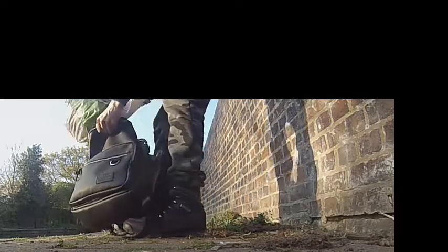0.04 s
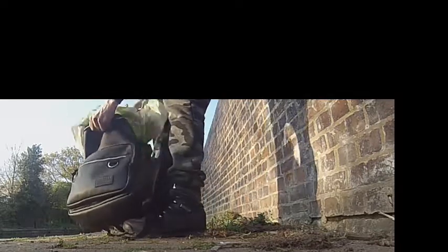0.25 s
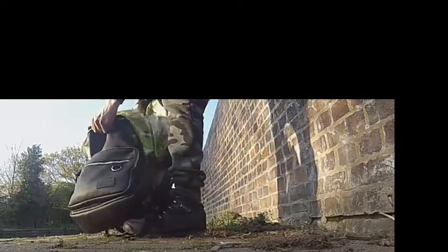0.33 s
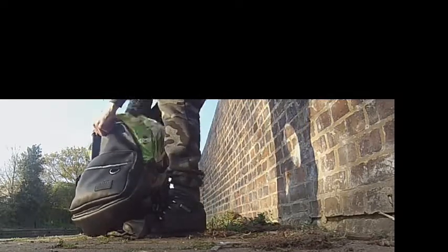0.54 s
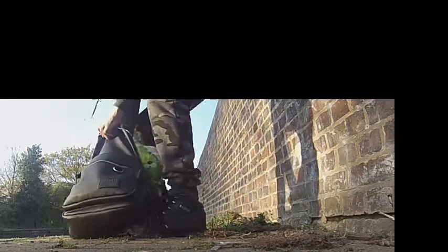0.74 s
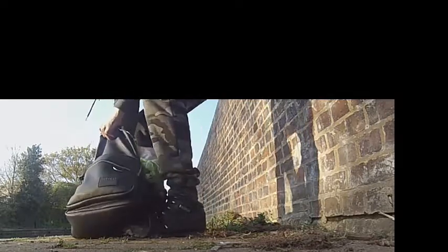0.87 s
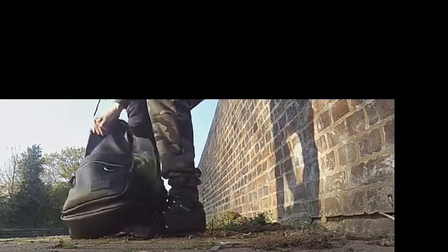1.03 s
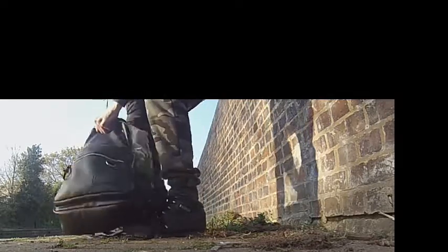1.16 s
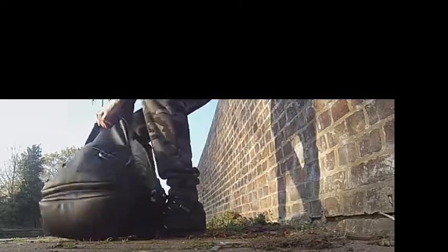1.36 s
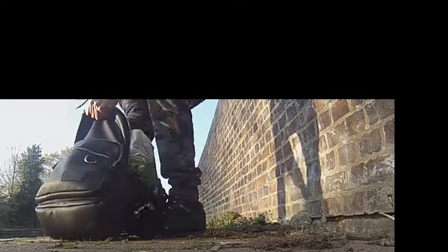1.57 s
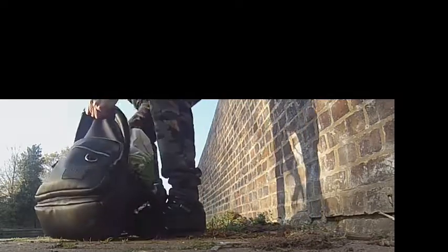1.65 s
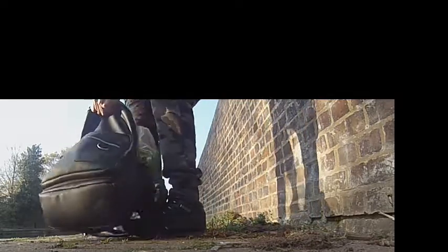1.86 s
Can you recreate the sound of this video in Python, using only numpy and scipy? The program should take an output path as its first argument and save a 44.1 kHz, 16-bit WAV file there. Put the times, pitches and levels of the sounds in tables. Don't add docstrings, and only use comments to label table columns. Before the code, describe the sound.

A plastic sack is stuffed into a fabric backpack, heard very close outdoors. Faint crinkles and tiny zip-pull ticks open; from 0.25 s crackling swells with sharp snaps. Dense rustling, stiff cracks and jerky seam creaks peak around 0.6-0.9 s. Rasping continues, with cloth thuds near 1.3 s, zip teeth and a buckle knock at 1.43-1.53 s, then sparse crinkles to about 1.9 s. Short wall echo, faint traffic.

```python
import sys
import numpy as np
from scipy import signal
from scipy.io import wavfile
from scipy.ndimage import uniform_filter1d

SR = 44100
rng = np.random.default_rng(int(sys.argv[2]) if len(sys.argv) > 2 else 0)


def generate_wav(sig):
    pcm = np.round(np.clip(np.atleast_2d(sig).T, -1, 1) * 32767).astype(np.int16)
    wavfile.write(sys.argv[1], SR, pcm)


def boost_factor(decibels):
    exponent = np.asarray(decibels, float) / 20
    return 10 ** exponent


N = 83790

# (start [s], peak [s], end [s], level [dB], treble lift [dB])
SQUEEZES = [(-.05, 0.042, 0.18, -45.5, -8), (0.137, 0.175, 0.2, -41.5, 3), (0.204, 0.21, 0.27, -38.5, -2),
            (0.25, 0.303, 0.42, -20, 5), (0.337, 0.386, 0.61, -30, -1), (0.394, 0.504, 0.63, -32.5, 7.5),
            (0.537, 0.623, 0.72, -22, 4), (0.683, 0.747, 0.75, -22.5, -1), (0.73, 0.77, 0.85, -27, 2),
            (0.812, 0.85, 0.99, -25, 2.5), (0.9, 0.945, 0.995, -36.5, -2), (0.96, 1.129, 1.153, -25, 3.5),
            (1.172, 1.208, 1.303, -27, 6), (1.196, 1.267, 1.6, -31, -3), (1.273, 1.363, 1.394, -25.5, 2),
            (1.36, 1.423, 1.43, -33.5, 5.5), (1.47, 1.562, 1.62, -34, 0), (1.553, 1.624, 1.67, -36, 3),
            (1.63, 1.703, 1.77, -49, 0), (1.753, 1.813, 1.78, -43.5, 1)]
# (frequency [Hz], level [dB])
FILM_SPECTRUM = [(250, -22), (500, -6), (1100, -5.5), (2500, -8.5), (4700, -10.5), (7500, -13),
                 (9200, -19.5), (15800, -26)]
# (time [s], peak [dB], centre [Hz], ring [s])
CREASE_SNAPS = [(.004, -40, 6900, 0.0017), (.032, -34, 5500, .005), (.0505, -30, 6000, 0.0065),
                (.104, -38, 8050, .003), (.131, -31, 11000, .003), (.170, -39, 7000, .004),
                (.215, -32, 8000, .003), (.223, -30, 10000, .003), (.236, -20, 7900, 0.0047),
                (.295, -11.5, 4840, 0.021), (.372, -15, 10000, 0.0054), (.404, -10, 10500, 0.004),
                (.419, -16, 9000, .003), (.444, -24, 8000, 0.0046), (.455, -22.5, 7000, 0.0033),
                (.472, -31, 9000, .004), (.490, -23, 10000, .003), (.499, -16, 10000, .004),
                (.606, -10, 12100, 0.0058), (.856, -9, 3500, 0.006), (.862, -9, 2930, 0.0035),
                (.937, -28, 8000, .004), (1.008, -34, 12000, 0.0027), (1.048, -15, 8900, 0.0036),
                (1.075, -26, 11000, .003), (1.102, -23, 5000, 0.0034), (1.119, -22, 8100, 0.0023),
                (1.187, -27, 6000, .003), (1.194, -31, 9000, 0.0033), (1.249, -19, 8500, 0.0046),
                (1.265, -22, 10000, .004), (1.309, -14, 7800, 0.0057), (1.375, -19, 5000, .003),
                (1.383, -14, 12500, 0.015), (1.399, -20, 11000, 0.0078), (1.539, -32, 9000, .004),
                (1.552, -26, 8000, 0.0046), (1.563, -15.5, 3870, 0.0079), (1.571, -28, 9000, .004),
                (1.614, -34, 6000, .003), (1.703, -30, 4000, .005), (1.740, -29, 8000, 0.003),
                (1.789, -25, 5960, 0.004), (1.803, -25.5, 4200, 0.0099), (1.822, -29, 4900, 0.0097),
                (1.827, -29, 6440, 0.007), (1.886, -34.5, 5000, .006)]
# (time [s], peak [dB], centre [Hz], ring [s])
FOLD_CRACKS = [(.7005, -9, 5000, .006), (.7065, -15, 5000, .004), (.7235, -14, 4300, .004),
               (.7355, -12, 4200, .005), (.743, -14, 6000, .006), (.7485, -10, 5400, .005),
               (.8488, -13, 6300, .003), (.8533, -2, 6400, .004)]
# (time [s], level [dB])
HAND_PUSH = [(0, -45.5), (0.199, -45), (0.211, -34), (.262, -32.5), (.278, -26), (.48, -34.5),
             (.645, -22.5), (.785, -25.5), (0.801, -25.5), (0.91, -20.5), (0.953, -34), (1.11, -27.5),
             (1.163, -30.5), (1.367, -22), (1.392, -35.5), (1.571, -32), (1.67, -46.5), (1.9, -46.5)]
# (frequency [Hz], level [dB])
CLOTH_SPECTRUM = [(40, -13), (120, -5), (250, -2), (420, 2), (750, -2.5), (1200, -6.5), (2500, -9),
                  (15000, -28.5)]
# (time [s], peak [dB], centre [Hz],
# ring [s])
CLOTH_THUDS = [(.205, -21.5, 600, 0.035), (.271, -21, 424, 0.013), (1.308, -17.5, 930, 0.015),
               (1.3528, -12, 1485, 0.0015), (1.358, -16, 1490, .0015), (1.3647, -14, 1500, 0.0017),
               (1.3724, -12, 2000, 0.0025), (1.3828, -15, 1800, 0.004), (1.561, -19.5, 895, 0.036),
               (1.775, -26, 530, 0.0026), (1.777, -30.5, 450, 0.01), (1.7815, -30, 603, .002),
               (.232, -24.5, 494, .015)]
# (start [s], length [s], level [dB], first slip rate [1/s], last slip rate [1/s])
SEAM_CREAKS = [
    (.628, .075, -27, 400, 110),
    (.824, 0.084, -25, 230, 180),
    (1.285, .065, -30, 300, 250),
    (.266, .07, -30.5, 380, 200),
]
# (time [s], peak [dB])
SEAM_JERKS = [(0.276, -21), (0.291, -18), (0.2959, -22), (0.3299, -18), (0.3489, -21), (0.5458, -25.5),
              (0.5617, -21), (0.587, -23), (0.5938, -22), (0.6234, -15), (0.6382, -18), (0.6464, -11.5),
              (0.6521, -12), (0.6577, -10.5), (0.663, -13), (0.6674, -11.5), (0.6799, -13), (0.6885, -17),
              (0.7008, -19), (0.7152, -17), (0.7398, -13), (0.7472, -18), (0.7858, -17), (0.801, -8),
              (0.8074, -12), (0.8127, -11), (0.8166, -14), (0.8216, -13), (0.8471, -10), (0.8636, -12),
              (0.8689, -16), (0.8844, -9), (0.907, -16), (1.0601, -18), (1.1231, -27), (1.3101, -14),
              (1.3528, -13), (1.358, -21), (1.3647, -15), (1.372, -20)]
# (frequency [Hz], level [dB])
SEAM_SPECTRUM = [(40, -22), (100, -11), (400, -1), (800, -1), (1500, -21), (4000, -21), (15000, -35.5)]
# (time [s], peak [dB], centre [Hz], ring [s])
ZIP_TEETH = [(1.441, -22, 5900, 0.0065), (1.448, -22, 5300, 0.0088), (1.456, -19, 6200, 0.013),
             (1.460, -16.5, 4700, 0.013), (1.464, -24, 6500, .008), (1.469, -18, 5940, 0.014),
             (1.481, -19, 6160, 0.013), (1.488, -29, 6000, 0.0088), (1.500, -24, 6060, 0.0093),
             (1.509, -24, 5900, .005), (1.521, -32, 6460, .005), (1.532, -26, 5960, 0.0076)]
# (time [s], peak [dB])
PULL_TICKS = [(0.07, -38), (.076, -36), (0.081, -25.5), (0.089, -36), (.109, -35), (.120, -33),
              (.126, -28.5), (.138, -43), (.157, -35), (.180, -41), (0.231, -24), (0.236, -28), (.242, -32),
              (0.248, -26)]
# (frequency [Hz], level [dB], T60 [s])
PULL_MODES = [(4170, 3.5, 0.011), (3900, -26, 0.0072), (5900, -6.5, 0.017), (7900, -10, 0.0079),
              (10200, -22, .006)]
# (time [s], peak [dB], frequency [Hz], T60 [s])
BUCKLE_KNOCKS = [
    (1.170, -22, 3130, 0.024),
    (1.431, -21, 2240, 0.022),
    (1.450, -37, 12600, .02),
    (1.483, -12, 2180, 0.017),
]
# (frequency [Hz], level [dB])
HUM_SPECTRUM = [(18, -9), (80, 2), (375, -6), (950, -4), (1800, -15), (2700, -27), (7000, -35),
                (15800, -52)]


def evened(x):
    return x / np.sqrt(np.mean(x ** 2) + 1e-20)


def colour(x, spectrum):
    hz, db = np.transpose(spectrum)
    bins_hz = abs(np.fft.fftfreq(8192, 1 / SR))
    log_gain = np.interp(np.log(bins_hz + 1), np.log(hz), db) * np.log(10) / 20
    response = np.fft.ifft(np.exp(np.conj(signal.hilbert(log_gain)))).real[:4096]
    return signal.oaconvolve(x, response)[:len(x)]


def drift(span_s):
    t = np.arange(-882, 883) / SR
    return evened(signal.oaconvolve(rng.standard_normal(N), np.exp(-(t / span_s) ** 2), "same"))


def crackle(per_s, spread_db, ring_s, clump_db, clump_s, one_way, tuned):
    patches = 24
    happens = rng.random(N) < per_s / SR
    size = boost_factor(spread_db * np.minimum(rng.exponential(1, N), 3.5)) * happens
    size = size * boost_factor(clump_db * drift(clump_s))
    patch = rng.integers(0, patches, N)
    t = np.arange(600) / SR
    t60_s = ring_s * rng.uniform(0.38, 1.83, (patches, 1))
    rings = rng.standard_normal((patches, 600)) * boost_factor(-60 * t / t60_s)
    rings = rings / np.linalg.norm(rings, axis=1, keepdims=True) + one_way * (t == 0)
    out = np.zeros(N)
    for k, hz in enumerate(np.geomspace(700, 11500, patches)):
        band = signal.butter(1, [hz / 1.22, hz * 1.22], "band", fs=SR)
        ring = rings[k] + tuned * signal.lfilter(*band, rings[k])
        out += signal.oaconvolve(size * (patch == k), ring)[:N]
    return out


def add(mix, s, sound):
    part = mix[round(s * SR):][:len(sound)]
    part += sound[:len(part)]


def bursts(table, width):
    out, t = np.zeros(N), np.arange(2000) / SR
    for s, db, hz, ring_s in table:
        push = rng.standard_normal(2000) + 7.8 * (t == 0)
        edges_hz = np.clip([hz / (1 + width), hz * (1 + 0.6 * width)], 20, 20000)
        band = signal.butter(3, edges_hz, "band", fs=SR, output="sos")
        x = signal.sosfilt(band, push * boost_factor(-30 * t / ring_s))
        add(out, s, boost_factor(db) * x / abs(x).max())
    return out


def film():
    gentle_below_db, treble_hz = -43, 8300
    t, out = np.arange(N) / SR, np.zeros(N)
    for gentle, per_s, clump_db in [(False, 4000, 2.0), (True, 1300, 3.0)]:
        clicks = crackle(per_s, spread_db=3.6, ring_s=0.005, clump_db=clump_db, clump_s=0.004,
                         one_way=0.08, tuned=5.5)
        x = evened(colour(clicks, FILM_SPECTRUM))
        treble = signal.sosfilt(signal.butter(3, treble_hz, "high", fs=SR, output="sos"), x)
        body_power, treble_power = np.zeros(N), np.zeros(N)
        for start, peak, end, db, lift_db in SQUEEZES:
            if (db < gentle_below_db) == gentle:
                swell = np.interp(t, [start, peak, end], [0, 1, 0])
                body_power += (boost_factor(db) * swell) ** 2
                treble_power += (boost_factor(db + lift_db) * swell) ** 2
        out += np.sqrt(body_power) * (x - treble) + np.sqrt(treble_power) * treble
    return out


def creases():
    return bursts(CREASE_SNAPS, width=0.8) + bursts(FOLD_CRACKS, width=0.35)


def cloth():
    push = boost_factor(np.interp(np.arange(N) / SR, *np.transpose(HAND_PUSH)))
    rasp = crackle(3500, spread_db=1.8, ring_s=0.008, clump_db=1.8, clump_s=0.008, one_way=0.5, tuned=0.3)
    return push * evened(colour(rasp, CLOTH_SPECTRUM))


def thuds():
    return bursts(CLOTH_THUDS, width=1.0)


def creaks():
    out = np.zeros(N)
    for s, length_s, db, first_hz, last_hz in SEAM_CREAKS:
        u = np.arange(0, 1, 1 / (SR * length_s))
        luck = rng.standard_normal((2, 9000))
        wander = evened(uniform_filter1d(luck[0], size=150))[:len(u)]
        slip_hz = first_hz * (last_hz / first_hz) ** u * np.exp(0.35 * wander)
        slips = np.diff(np.cumsum(slip_hz) / SR // 1, prepend=0)
        slips = slips * boost_factor(1.7 * luck[1, :len(u)]) * np.sin(np.pi * u ** 0.68) ** 0.26
        add(out, s, boost_factor(db) * evened(colour(np.pad(slips, (0, 400)), SEAM_SPECTRUM)))
    return out


def jerks():
    out = np.zeros(N)
    push = colour(1.0 * (np.arange(500) == 0), SEAM_SPECTRUM)
    for s, db in SEAM_JERKS:
        add(out, s, boost_factor(db) * push / push.max())
    return out


def zip_teeth():
    return bursts(ZIP_TEETH, width=0.28)


def metal():
    out, t = np.zeros(N), np.arange(2000) / SR
    attack = np.minimum(t / 0.001, 1)
    rings = list(BUCKLE_KNOCKS)
    for s, db in PULL_TICKS:
        rings += [(s, db + mode_db, hz, t60_s) for hz, mode_db, t60_s in PULL_MODES]
    for s, db, hz, t60_s in rings:
        hz = hz * (1 + 0.015 * rng.uniform(-1, 1))
        add(out, s, boost_factor(db - 60 * t / t60_s) * attack * np.sin(2 * np.pi * hz * t))
    return out


def yard(x):
    wall_s, wall_db, tail_db, tail_t60_s = 0.0027, -18.5, -18, 0.044
    t = np.arange(6000) / SR
    tail = rng.standard_normal(6000) * boost_factor(-60 * t / tail_t60_s) * (t > wall_s)
    response = boost_factor(tail_db) * tail / np.linalg.norm(tail) + (t == 0)
    add(response, wall_s, boost_factor([wall_db]))
    return signal.oaconvolve(x, response)[:N]


def hum():
    level_db = -41.5 + 1.3 * drift(0.012)
    return boost_factor(level_db) * evened(colour(rng.standard_normal(N), HUM_SPECTRUM))


def scene():
    hits = creases() + thuds() + creaks() + jerks() + zip_teeth() + metal()
    x = film() + cloth() + yard(hits) + hum()
    return np.array([x, x])


def top_cut(x):
    return signal.sosfilt(signal.butter(12, 16330, fs=SR, output="sos"), x)


def record(dry):
    edge_hz, left_cut_hz, side_edge_hz = 15250, 92, 940
    dry = signal.oaconvolve(dry, signal.firwin(255, edge_hz, fs=SR)[None], "same")
    left = signal.lfilter(*signal.butter(1, left_cut_hz, "high", fs=SR), dry[0])
    mid, side = (left + dry[1]) / 2, (left - dry[1]) / 2
    side = signal.oaconvolve(side, signal.firwin(301, side_edge_hz, fs=SR), "same")
    return top_cut(np.array([mid + side, mid - side]))


dry = scene()
out = record(dry)
generate_wav(out)
```